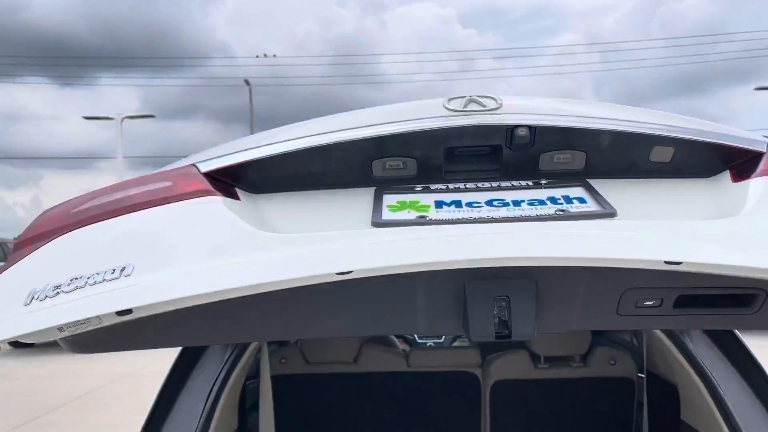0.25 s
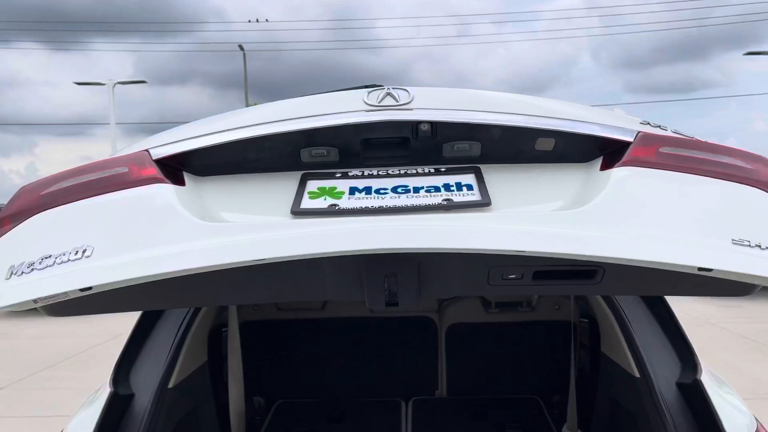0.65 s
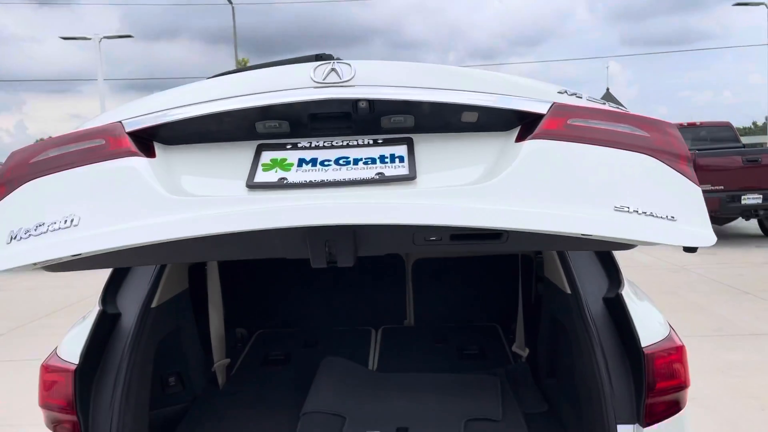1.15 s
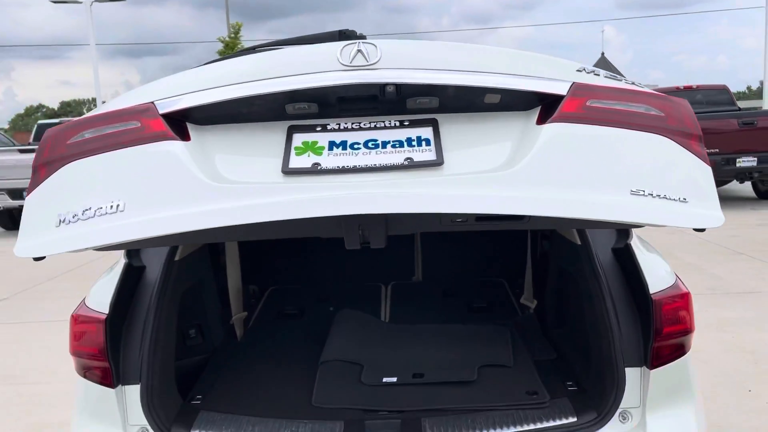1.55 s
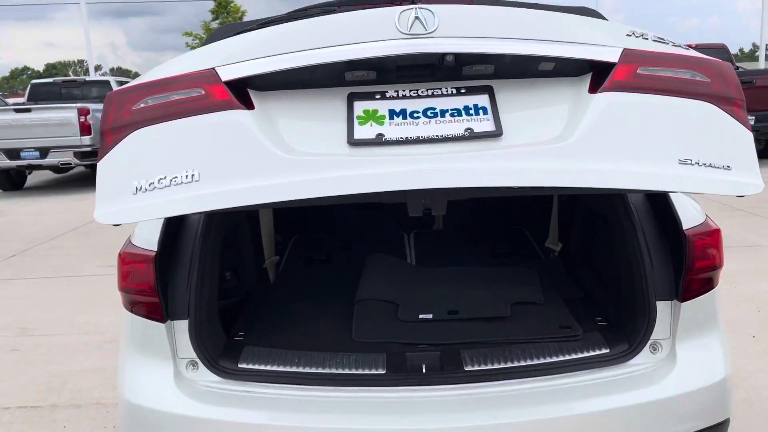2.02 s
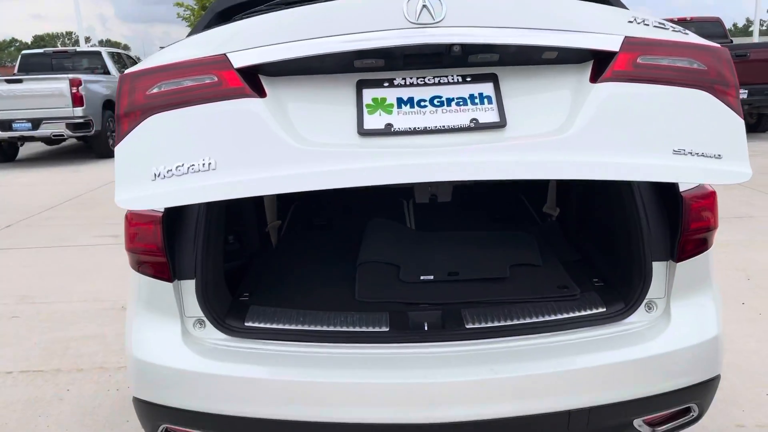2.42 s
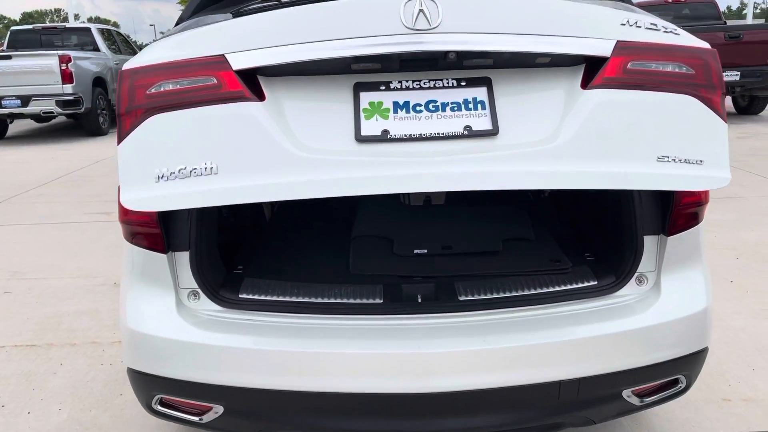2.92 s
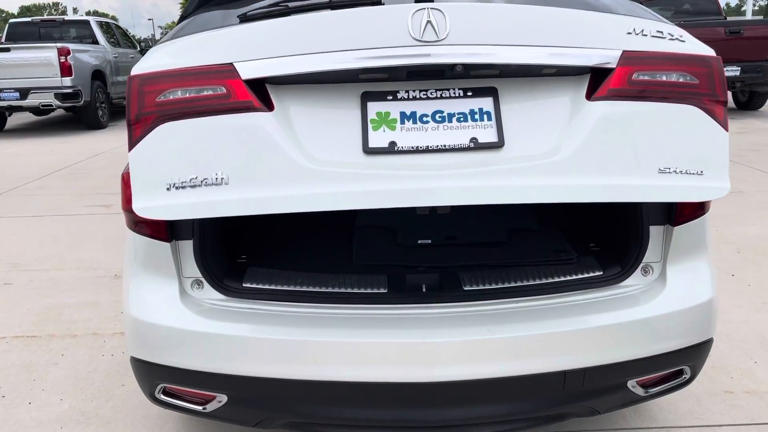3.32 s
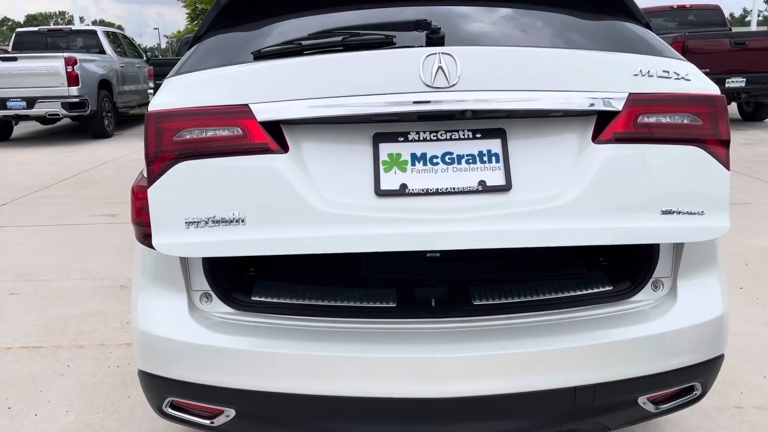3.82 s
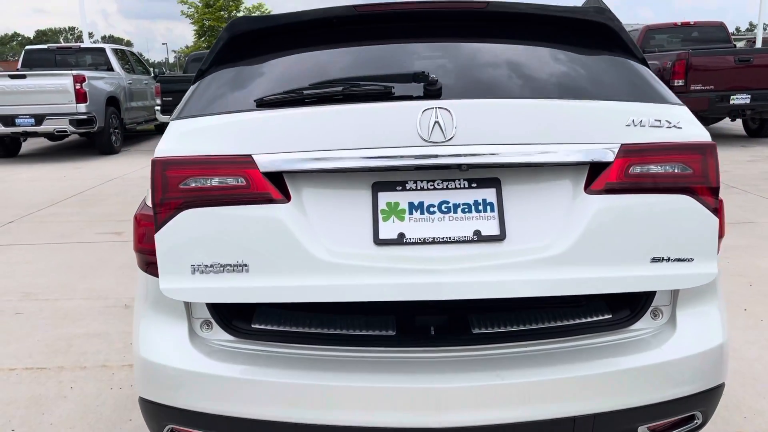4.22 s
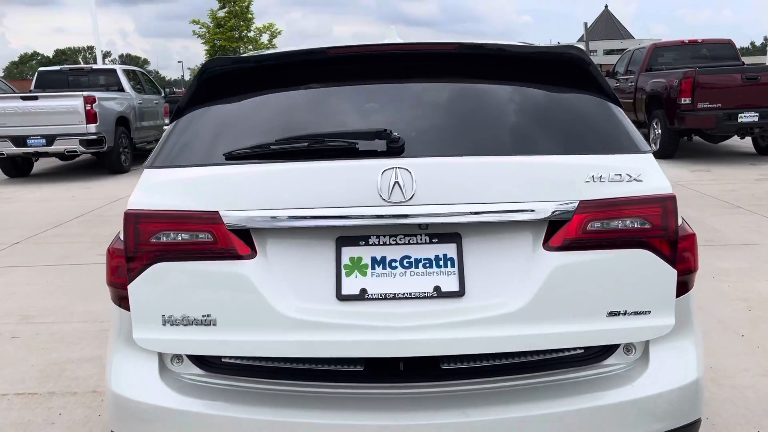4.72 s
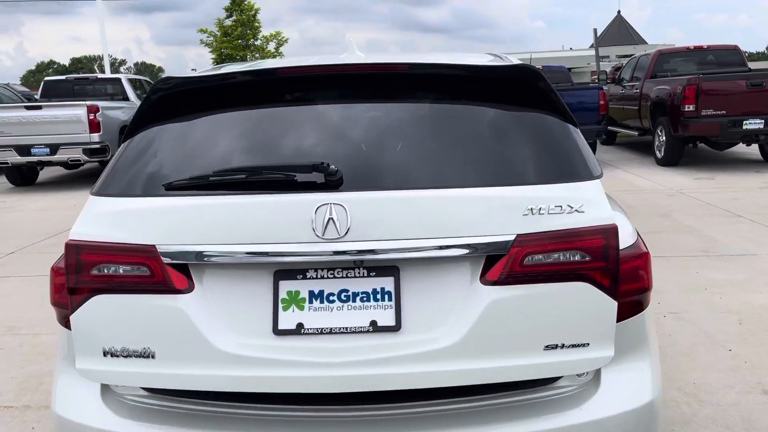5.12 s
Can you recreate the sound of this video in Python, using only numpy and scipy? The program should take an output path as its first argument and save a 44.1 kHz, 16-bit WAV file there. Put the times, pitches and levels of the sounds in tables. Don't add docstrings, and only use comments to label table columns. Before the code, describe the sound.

A truck's low engine drone eases off and fades over distant traffic while a powered car tailgate whines very faintly and closes with tiny seal ticks.

```python
import sys
import numpy as np
from scipy import signal
from scipy.fft import rfft, irfft, next_fast_len
from scipy.io import wavfile
from scipy.ndimage import uniform_filter1d, map_coordinates

SR = 44100
rng = np.random.default_rng(int(sys.argv[2]) if len(sys.argv) > 2 else 0)


def linear_from_db(decibels):
    return 10 ** (np.asarray(decibels, float) / 20)


def unload_audio(sound):
    columns = np.transpose(np.atleast_2d(sound))
    steps = np.round(np.clip(columns, -1, 1) * 32767)
    wavfile.write(sys.argv[1], SR, steps.astype(np.int16))


N = 236101

# (time [s], commutator frequency [Hz], load [dB])
TAILGATE_MOTOR = [(0.0, 270, -5), (.45, 258, -4), (.62, 261, -22), (.85, 254, 0.5), (1.85, 261, -1),
                  (2.05, 252, -18), (2.4, 247, -5), (2.6, 232, -2), (3.1, 213, 3.5), (3.7, 186, 2.5),
                  (4.46, 142, 3.5), (4.9, 132, -2.5), (5.35, 123, 2)]
# (frequency [Hz], level per Hz [dB])
BRUSH_SPECTRUM = [(7500, -49), (8500, -18), (9500, -2), (10200, 7), (10800, 10), (11400, 0.5), (11900, -13),
                  (12400, -68)]
# (time [s], extra level [dB], length [s])
HATCH_FACING = [
    (2.25, 7, .5),
]
CHOPPER_HZ = 9998
UPPER_DB, CARRIER_DB, LOWER_DB = -73, -78, -74
SLOWING_DB, LINE_SWAY_DB = 2, 3.5
BRUSH_DB = -62

# (time [s], peak level [dB], frequency [Hz], decay t60 [s], roughness [0-1])
SEAL_TICKS = [
    (4.28, -52, 6200, .1, .4),
    (4.397, -49, 6050, .06, .2),
    (4.404, -46, 7950, .07, .2),
    (4.436, -50, 7600, .06, .2),
    (4.532, -49, 7850, .16, .4),
    (4.558, -49, 7950, .1, .3),
    (4.583, -50, 7500, .06, .3),
]
# (time [s], peak level [dB], frequency [Hz], decay t60 [s], roughness [0-1])
BIRD_CHIPS = [
    (.69, -46, 4330, 0.13, 0.4),
    (1.436, -40, 2150, .15, 0.8),
    (1.731, -41, 8760, .06, .2),
    (1.74, -38, 8850, .08, .2),
    (1.766, -48, 8850, .2, .5),
]

# (time [s], firing frequency [Hz], firing tone level [dB])
TRUCK_ENGINE = [
    (0.0, 111.4, -15.5),
    (0.29, 110.4, -28),
    (0.55, 109.7, -24.5),
    (0.9, 109.0, -20),
    (1.12, 105.9, -22),
    (1.25, 100.5, -24.5),
    (1.41, 96.07, -28),
    (1.93, 95.27, -28.5),
    (2.3, 90.1, -39),
]
# (time [s], depth [dB])
ECHO_FADES = [
    (.44, 3.5),
    (.76, 3),
    (.96, 4),
    (1.21, 5),
    (1.38, 10),
    (1.99, 13),
]
ECHO_FADE_S = 0.021
OCTAVE_DB, OCTAVE_DB_PER_S = -43, -8
# (time [s], frequency [Hz])
FAR_ENGINE_HZ = [(2.1, 214.8), (2.9, 222), (3.6, 234), (4, 235), (4.4, 222), (5.35, 214.8)]
# (time [s], peak level [dB], length [s])
FAR_ENGINE_SWELLS = [
    (2.31, -48, 0.06),
    (2.55, -45, 0.13),
    (3.11, -38.5, 0.056),
    (3.55, -44, 0.2),
    (3.84, -43.5, 0.091),
    (4.18, -50.5, 0.18),
    (4.78, -43, .14),
    (5.3, -46.5, .15),
]
FAR_ENGINE_DB = -59
# (frequency [Hz], level [dB])
PLANT_LINES = [(69.9, -44), (177.9, -57), (290.2, -57), (443.6, -69.5)]
# (time [s], peak level [dB], length [s])
PLANT_GUSTS = [
    [(.17, -31.5, 0.084), (.52, -44, 0.092), (1.3, -43, 0.13), (2.05, -50, 0.15), (3.3, -56.5, 0.23),
     (4.94, -38.5, 0.092), (5.22, -46, 0.077)],
    [(.17, -50, 0.11), (.45, -43, 0.12), (.74, -42.5, 0.14), (2.55, -46, .15), (4.95, -50, 0.17),
     (5.28, -43, 0.18)],
    [(0, -42, 0.054), (.38, -44.5, .12), (.58, -46, 0.065), (.8, -44.5, 0.053), (1.85, -58, 0.2704),
     (5.22, -60, 0.052)],
    [(.4, -55, .1), (.76, -53, 0.055), (2.0, -59, 0.26), (2.75, -59.5, 0.16), (5.25, -64, 0.043)],
]

# (time [s], roar centre frequency [Hz], roar level [dB])
TYRE_ROAR = [(0.0, 830, -43.5), (0.79, 995, -43.5), (1.25, 895, -44), (1.74, 960, -43.5),
             (2.3, 926.5, -43.5), (2.78, 930, -40), (3.1, 920, -43), (3.64, 893, -42.5), (4.05, 876, -42.5),
             (4.2, 870, -44), (4.59, 840, -42), (5.35, 853, -42)]
TREAD_DB, TREAD_GROWS, TREAD_SWAY_DB = -7.5, 2.5, 3.5
# (frequency [Hz], level per Hz [dB])
RUMBLE_SPECTRUM = [(20, -54), (33, -20), (42, 5), (60, -5.5), (98, 4), (130, -2), (165, -10), (220, -7.5),
                   (275, -20), (320, -18.5), (420, -23), (700, -120)]
BODY_SPECTRUM = [(150, -46), (250, 4), (313, -5.5), (399, -13), (462, -4.5), (521, -15), (800, -13),
                 (1040, -48), (1760, -120)]
HISS_SPECTRUM = [(300, -60), (600, -25), (1200, -2), (1500, -2), (2300, -4.5), (2800, -10.5), (4200, -17.5),
                 (4600, -21.5), (7000, -24.5), (7800, -26.5), (10600, -24.5), (11500, -34.5), (12100, -47),
                 (12400, -90)]
FIZZ_SPECTRUM = [(3500, -64), (4500, -3), (6000, 1.5), (7000, -2.5), (7800, 3), (8600, -3), (9600, -28),
                 (11000, -31), (12300, -73)]
ROAD_DB = [-32.5, -46, -44, -62.5]
ROAD_SWAY_DB = [0.18, 0.5, 0.28, .4]
ROAD_SWAY_HZ = 2.49
ROAD_PATCHY_DB = [0.49, 1.2, 1.2, 1.8]
# (time [s], extra level [dB], length [s])
FAR_LORRIES = [
    (1.1, -25, 0.12),
    (2.4, -21, 0.16),
    (3.3, -15, 0.11),
    (4.1, -10, 0.26),
    (4.9, -21, 0.13),
]
# (time [s], extra level [dB], length [s])
FAR_CARS = [
    (.1, -18, 0.2),
    (1.43, -27, 0.11),
    (3.15, -14.5, 0.25),
    (5.1, -12.5, 0.37),
]
# (time [s], extra level [dB], length [s])
SEAL_RUSTLE = [
    (4.3, -12, .08),
    (4.42, -5, 0.054),
    (4.56, -4, .06),
]

# (time [s], peak level [dB], length [s])
WIND_PUFFS = [
    (.45, -42, 0.21),
    (1.1, -42, 0.073),
    (3.375, -44, 0.032),
    (4.878, -49, 0.052),
]
# (frequency [Hz], level [dB])
PUFF_SPECTRUM = [(30, -49), (70, -1), (110, 3), (200, -19), (400, -84)]
# (frequency [Hz], likeness [0-1], left lead [rad], left minus right [dB])
PORT_PAIR = [(250, .975, .1, 0), (600, .66, -.1, 1.8), (900, .72, -.1, .6), (1120, .21, 0, 2.3),
             (1500, .68, -1.6, .6), (2750, .72, 1.2, 1.2), (4100, .79, .4, 1.1), (5200, .49, .7, 3.8),
             (6400, .88, .1, 1.2), (7300, .65, .9, 4), (8600, .99, 0, 0), (9900, .99, -2.5, 0),
             (10900, .99, -3.75, 0), (11800, .99, -6.28, 0)]


def unit(x):
    return x / np.sqrt(np.mean(x ** 2) + 1e-20)


def along(points, hz):
    f, *cols = np.transpose(points)
    return np.squeeze([np.interp(np.log(hz + 1), np.log(f + 1), c) for c in cols])


def curves(rows):
    s, *cols = np.transpose(rows)
    return [np.interp(np.arange(N) / SR, s, c) for c in cols]


def swells(rows):
    now = np.arange(N) / SR
    return sum(linear_from_db(db) * np.exp(-((now - s) / length) ** 2) for s, db, length in rows)


def wobble(rate):
    knots = rng.standard_normal(int(N * rate / SR) + 4)
    return map_coordinates(knots, [np.arange(N) * rate / SR])


def filtered(x, response):
    m = next_fast_len(N + 8192)
    return irfft(rfft(x, m) * response(np.fft.rfftfreq(m, 1 / SR)), m)[..., :N]


def tone(hz, blur):
    phase = 2 * np.pi * np.cumsum(hz) / SR + rng.uniform(0, 2 * np.pi)
    return np.sqrt(2) * np.sin(phase + blur * wobble(12))


def rush(gain, patchy_db):
    hz, s, z = signal.stft(rng.standard_normal((2, N + 2048)), SR, nperseg=2048)
    field = uniform_filter1d(rng.standard_normal(z.shape[1:]), size=16, axis=0)
    field = uniform_filter1d(field, size=5, axis=1)
    shaped = z * gain(hz[:, None], s) * linear_from_db(patchy_db * unit(field))
    return unit(signal.istft(shaped, SR, nperseg=2048)[1][:, :N])


def steady_rush(spectrum, patchy_db):
    return rush(lambda hz, s: linear_from_db(along(spectrum, hz[:, 0]))[:, None], patchy_db)


def motor():
    bars_hz, load_db = curves(TAILGATE_MOTOR)
    speed_db = SLOWING_DB * np.log2(bars_hz / bars_hz[0])
    facing = 1 + swells(HATCH_FACING)
    whine = np.zeros(N)
    for shift_hz, db in [(bars_hz, UPPER_DB), (0 * bars_hz, CARRIER_DB), (-bars_hz, LOWER_DB)]:
        level_db = db + speed_db + LINE_SWAY_DB * wobble(2.5) + 1.6 * wobble(6)
        whine += facing * linear_from_db(level_db) * tone(CHOPPER_HZ + shift_hz, blur=0.4)
    brushes = steady_rush(BRUSH_SPECTRUM, patchy_db=5.0)[0]
    return whine + linear_from_db(BRUSH_DB + load_db) * brushes


def chips(rows):
    out, t = np.zeros(N + SR), np.arange(SR // 4) / SR
    for s, db, hz, t60, rough in rows:
        pitch = hz * (1 - 0.026 * np.exp(-t / 0.0026))
        flutter = unit(uniform_filter1d(rng.standard_normal(len(t)), size=150))
        ring = np.sin(2 * np.pi * np.cumsum(pitch) / SR) * (1 - rough + rough * flutter)
        onset = 1 - np.exp(-t / 0.0029)
        out[round(s * SR):][:len(t)] += linear_from_db(db - 60 * t / t60) * onset * ring
    return out[:N]


def truck():
    firing_hz, firing_db = curves(TRUCK_ENGINE)
    now = np.arange(N) / SR
    for s, depth_db in ECHO_FADES:
        firing_db = firing_db - depth_db * np.exp(-((now - s) / ECHO_FADE_S) ** 2)
    octave_db = OCTAVE_DB + OCTAVE_DB_PER_S * now + 1.8 * wobble(5.4)
    near = np.clip((TRUCK_ENGINE[-1][0] - now) / 0.22, 0, 1)
    firing = linear_from_db(firing_db) * tone(firing_hz, blur=0.066)
    octave = linear_from_db(octave_db) * tone(2 * firing_hz, blur=0.3)
    return near * (firing + octave)


def far_engine():
    hz, = curves(FAR_ENGINE_HZ)
    entry = np.clip((np.arange(N) / SR - FAR_ENGINE_HZ[0][0]) / 0.11, 0, 1)
    level = entry * (linear_from_db(FAR_ENGINE_DB) + swells(FAR_ENGINE_SWELLS))
    return level * linear_from_db(4.8 * wobble(9)) * tone(hz, blur=0.67)


def plant():
    out = np.zeros(N)
    for (hz, db), gusts in zip(PLANT_LINES, PLANT_GUSTS):
        out += (linear_from_db(db) + swells(gusts)) * tone(np.full(N, hz), blur=0.46)
    return out


def tyre_band(width_hz):
    at, centre_hz, _ = np.transpose(TYRE_ROAR)
    return rush(lambda hz, s: 1 / (1 + ((hz - np.interp(s, at, centre_hz)) / width_hz) ** 2), patchy_db=1.33)


def tyres():
    _, roar_db = curves(TYRE_ROAR)
    tread_db = TREAD_DB + TREAD_GROWS * (roar_db - roar_db.mean()) + TREAD_SWAY_DB * wobble(3.84)
    return linear_from_db(roar_db) * (tyre_band(width_hz=268) + linear_from_db(tread_db) * tyre_band(width_hz=67))


def traffic():
    spectra = [RUMBLE_SPECTRUM, BODY_SPECTRUM, HISS_SPECTRUM, FIZZ_SPECTRUM]
    layers = []
    for db, sway_db, spectrum, patchy_db in zip(ROAD_DB, ROAD_SWAY_DB, spectra, ROAD_PATCHY_DB):
        level = linear_from_db(db + sway_db * wobble(ROAD_SWAY_HZ))
        layers.append(level * steady_rush(spectrum, patchy_db))
    rumble, body, hiss, fizz = layers
    rumble = (1 + swells(FAR_LORRIES)) * rumble
    hiss = (1 + swells(FAR_CARS)) * hiss
    fizz = (1 + swells(SEAL_RUSTLE)) * fizz
    return rumble + body + hiss + fizz


def puffs():
    low = filtered(rng.standard_normal(N), lambda hz: linear_from_db(along(PUFF_SPECTRUM, hz)))
    return swells(WIND_PUFFS) * unit(low) * np.array([[1], [-1]])


def ports(direct, diffuse):
    def split(hz):
        angle = np.arccos(np.clip(along(PORT_PAIR, hz)[0], 0, 1)) / 2
        return np.array([np.cos(angle), np.sin(angle)])

    def lead_and_balance(hz):
        _, lead_rad, balance_db = along(PORT_PAIR, hz)
        half = np.array([[0.5], [-0.5]])
        return linear_from_db(half * balance_db) * np.exp(1j * half * lead_rad)

    shared, apart = filtered(diffuse, split)
    pair = direct + np.array([shared + apart, shared - apart])
    return filtered(pair, lead_and_balance)


def scene():
    direct = motor() + chips(SEAL_TICKS) + chips(BIRD_CHIPS) + truck() + far_engine() + plant()
    diffuse = tyres() + traffic()
    return ports(direct, diffuse) + puffs()


def low_pass(x):
    return signal.sosfilt(signal.butter(12, 12040, fs=SR, output="sos"), x)


def record(dry):
    cut = filtered(dry, lambda hz: 1 / (1 + (36 / (hz + 1)) ** 8))
    now = np.arange(N) / SR
    opening = 1 - 0.6 * np.exp(-now / 0.002)
    settle = linear_from_db(0.54 * np.exp(-now / 0.036))
    return low_pass(cut * opening * settle)


dry = scene()
out = record(dry)
unload_audio(out)
```